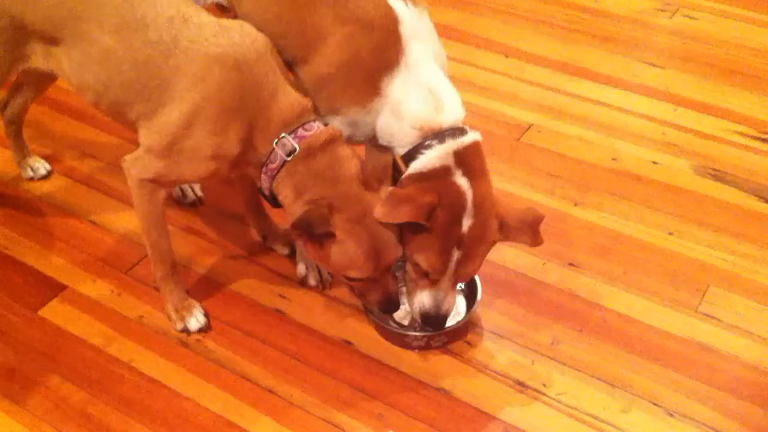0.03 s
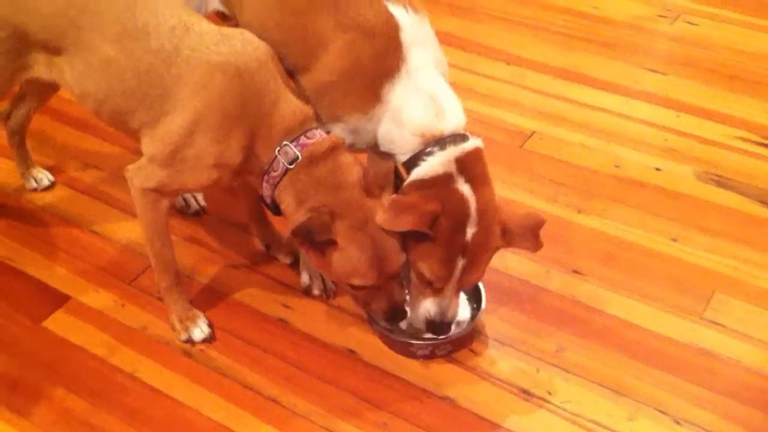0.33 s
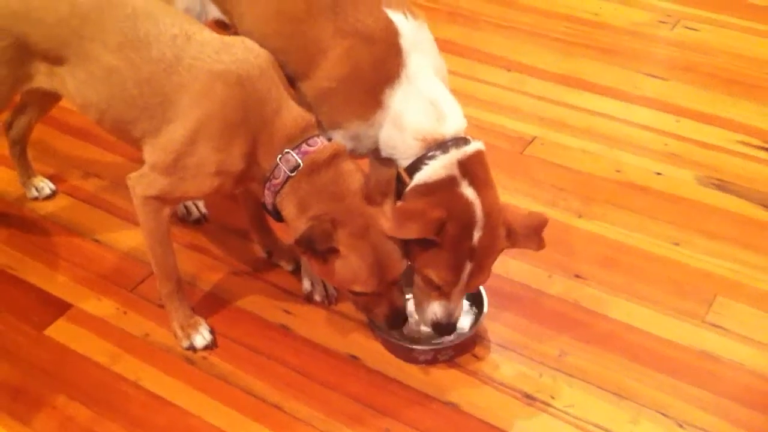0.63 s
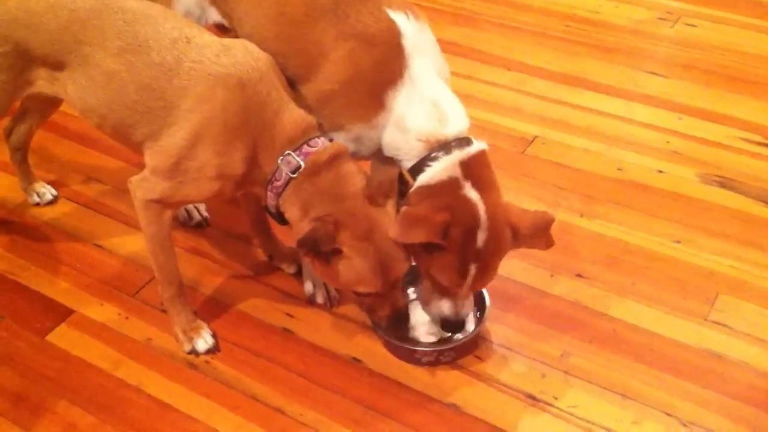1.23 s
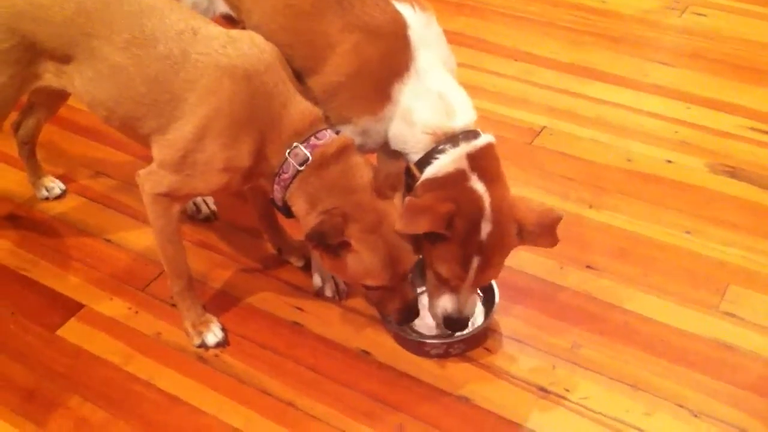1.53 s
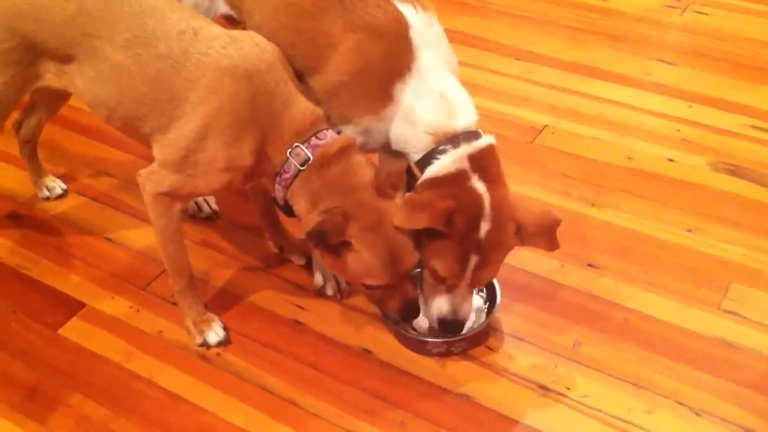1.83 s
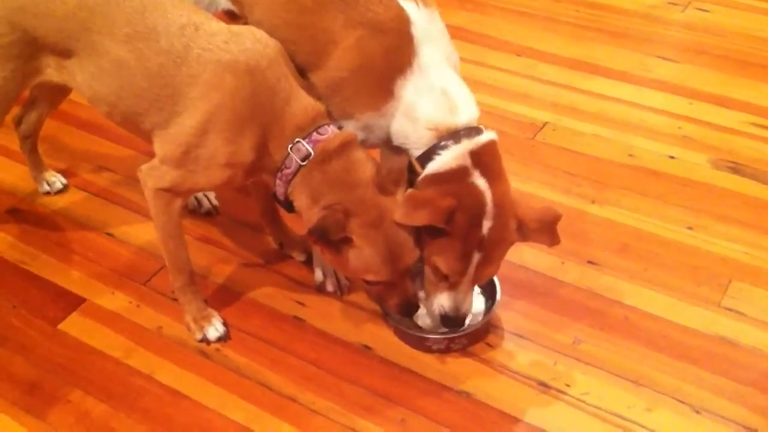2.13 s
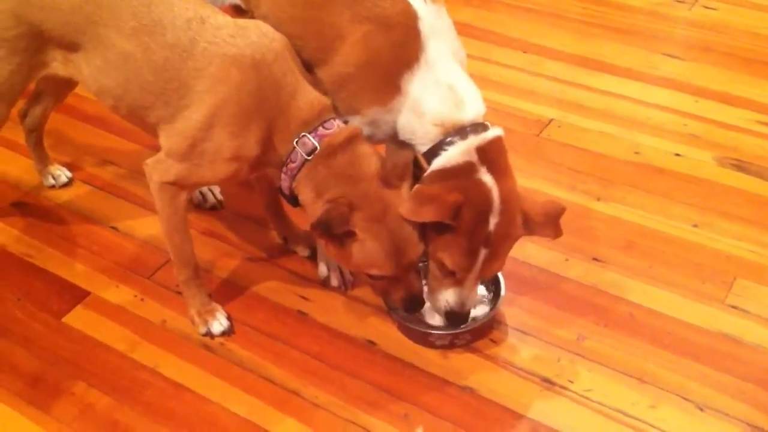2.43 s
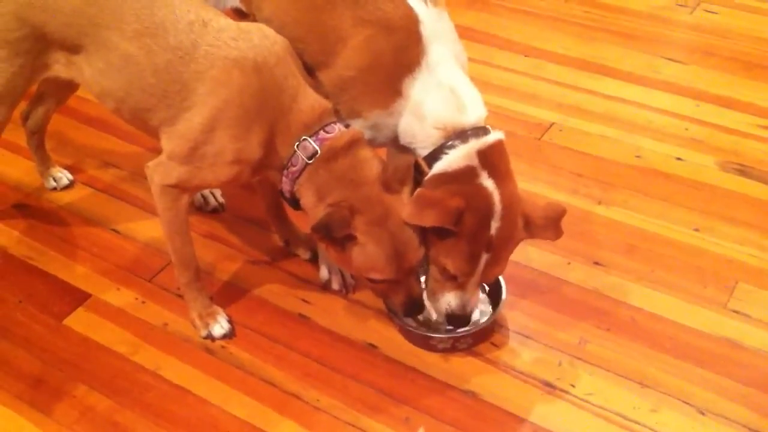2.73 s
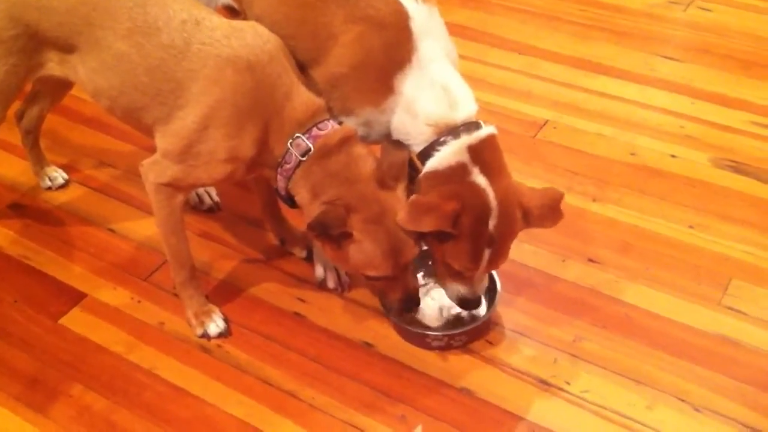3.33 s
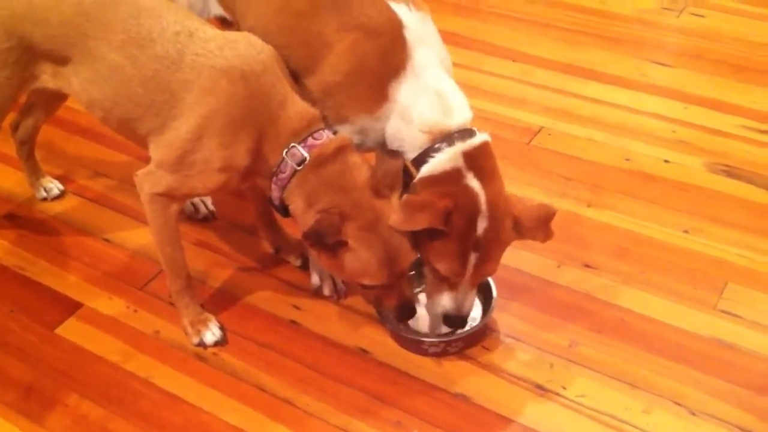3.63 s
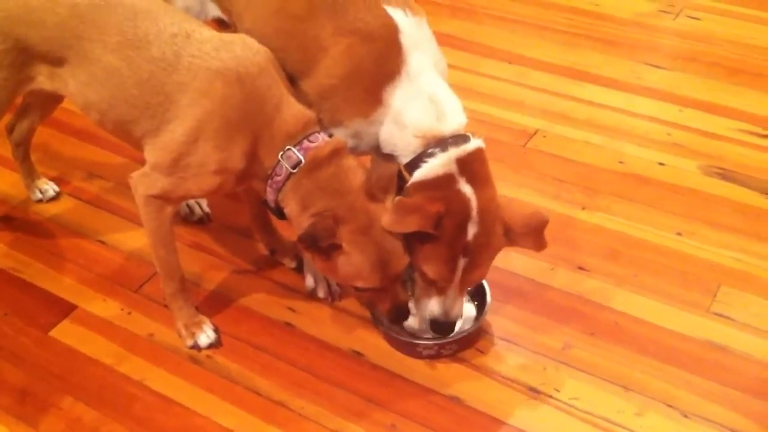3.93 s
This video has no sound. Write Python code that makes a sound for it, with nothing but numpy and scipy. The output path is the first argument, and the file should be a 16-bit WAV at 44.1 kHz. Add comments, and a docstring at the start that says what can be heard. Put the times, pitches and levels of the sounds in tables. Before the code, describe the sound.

Dogs drink from a metal bowl indoors, lapping irregularly with squelches, plops and trickling drops. The bowl rings faintly and a collar tag touches it early and again near the end, over a soft rush of room air.

```python
"""Two dogs at a water bowl

Two dogs lap from one steel bowl on the wooden floor of a lively room. Each lap is a wet smack of the
tongue, a spray of droplets and a squelch in the mouth; trapped air plops, drips fall back, a collar tag
chinks and the bowl rings faintly. An appliance hums under the steady rush of the room."""
import sys
import numpy as np
from scipy import signal
from scipy.fft import rfft, irfft
from scipy.io import wavfile

SR = 44100
rng = np.random.default_rng(int(sys.argv[2]) if len(sys.argv) > 2 else 0)


def output_pcm(signal):
    """Save a mono or channel-first signal as 16-bit PCM at the path in sys.argv[1].

    Samples are clipped to [-1, 1] before scaling.
    """
    pcm = np.clip(np.atleast_2d(signal).T, -1, 1) * 32767
    wavfile.write(sys.argv[1], SR, np.round(pcm).astype(np.int16))


N = 176400
TIME = np.arange(N) / SR
BRIEF = TIME[:SR // 8]  # time axis of one short event


def from_db(db):
    return 10 ** (np.asarray(db) / 20)


def unit_rms(x):
    return x / np.sqrt(np.mean(x ** 2) + 1e-20)


def at_hz(points, hz):
    """Reads a table on a log-frequency axis."""
    points_hz, values = np.transpose(points)
    return np.interp(np.log(hz + 1e-9), np.log(points_hz), values)


def add(out, start_s, x):
    i = int(start_s * SR)
    out[i:i + len(x)] += x[:N - i]


def band(x, low_hz, high_hz):
    edges = [low_hz, min(high_hz, SR / 2 - 2000)]
    return signal.sosfilt(signal.butter(2, edges, "band", fs=SR, output="sos"), x)


def resonate(x, hz, width_hz):
    """One resonance with a gain of 1 at its peak."""
    r = np.exp(-np.pi * width_hz / SR)
    feedback = [1, -2 * r * np.cos(2 * np.pi * hz / SR), r * r]
    return signal.lfilter(np.array([1, 0, -1]) * (1 - r * r) / 2, feedback, x + 1e-18)


def pops(per_s, size, spread_db=3.5):
    """Random clicks of uneven strength."""
    strength = from_db(spread_db * np.minimum(rng.exponential(1, size), 4))
    return (rng.random(size) < per_s / SR) * strength * rng.choice([-1, 1], size)


def swell(t, rise_s):
    """Rises to 1 after rise_s, then dies away."""
    u = np.maximum(t, 0) / rise_s
    return u * np.exp(1 - u)


def rising_phase(hz, glide_per_s):
    """Phase of a bubble whose pitch climbs steadily from hz."""
    return 2 * np.pi * hz * (BRIEF + glide_per_s * BRIEF ** 2 / 2)


def droplets(spectrum, per_s, cycles, sizes=32, small_bias=0.8):
    """Tiny bubbles ring for a few cycles, the small ones most often. Yields (Hz, sound) for each size."""
    pitches = np.geomspace(450, 15000, sizes)
    shares = pitches ** small_bias / np.sum(pitches ** small_bias)
    for hz, share in zip(pitches, shares):
        width_hz = 2 * hz / cycles
        ring = resonate(pops(per_s * share, N), hz, width_hz)
        ring = resonate(ring, hz, width_hz)  # the second pass softens each onset
        yield hz, from_db(at_hz(spectrum, hz)) * unit_rms(ring) / np.sqrt(sizes)


def room_air(level_db=-57):
    """Room tone: a steady, low rush of air."""
    # Each row: frequency in Hz, relative spectral density in dB.
    spectrum = [(50, -24.5), (70, -24), (95, -13.5), (125, -6), (200, 0.5), (250, 6), (310, 2), (460, -0.5),
                (600, -6), (1050, -7.5), (1300, -10.5), (2700, -16), (5300, -17), (6800, -26), (12900, -26),
                (15500, -39)]
    gain = from_db(at_hz(spectrum, np.fft.rfftfreq(N, 1 / SR)))
    return from_db(level_db) * unit_rms(irfft(rfft(rng.standard_normal(N)) * gain, N))


def appliance_hum(waver=0.48):
    """An appliance hums; a narrow band of noise around each tone makes it waver."""
    # The tones of the hum. Each row: frequency in Hz, level in dB.
    tones = [(157, -78.5), (175, -80), (236.5, -67), (410, -74.5), (472, -71.5)]
    out = np.zeros(N)
    for hz, db in tones:
        tone = np.sqrt(2) * np.sin(2 * np.pi * (hz * TIME + rng.random()))
        noise = unit_rms(resonate(rng.standard_normal(N), hz, width_hz=8.8))
        out += from_db(db) * (tone + waver * noise)
    return out


def room_response(tail_db=-2, build_s=0.0025, echo_db=-4.5, echo_span_s=0.025, echo_count=12):
    """A few early echoes off floor and furniture, then a diffuse tail that dies band by band."""
    # Reverberation. Each row: frequency in Hz, seconds to fall by 60 dB.
    t60 = [(200, 0.93), (900, 0.49), (2100, 0.71), (5500, 0.6), (14500, 0.59)]
    t, edges = TIME[:SR], np.geomspace(100, 18000, 12)
    tail, echoes = np.zeros(SR), np.zeros(SR)
    for low, high in zip(edges, edges[1:]):
        decay = from_db(-60 * t / at_hz(t60, np.sqrt(low * high)))
        tail += band(rng.standard_normal(SR), low, high) * decay
    tail *= 1 - np.exp(-(t / build_s) ** 2)
    signs = rng.choice([-1, 1], echo_count)
    delays_s = echo_span_s * rng.uniform(0.05, 1, echo_count)
    echoes[(delays_s * SR).astype(int)] = signs / np.sqrt(echo_count)
    return from_db(tail_db) * tail / np.linalg.norm(tail) + from_db(echo_db) * echoes


def room_echoes(water, spots=6, spot_change_s=0.008):
    """Drops burst at changing spots around the bobbing heads, so one set of echoes fades into the next."""
    out, place = np.zeros(N), TIME / spot_change_s
    for spot in range(spots):
        away = np.abs((place - spot + spots / 2) % spots - spots / 2)
        crossfade = np.cos(np.pi / 2 * np.minimum(away, 1))
        out += signal.fftconvolve(water * crossfade, room_response())[:N]
    return out


def bowl_ring(water, t60_s=0.29):
    """The steel wall rings along with the water."""
    # The modes of the bowl. Each row: frequency in Hz, gain in dB.
    modes = [(833, 0.5), (955, -12), (1016, 1.5), (1100, 10), (1190, 5), (1298, 5.5), (1351, 3), (2382, -5),
             (3798, -1)]
    width_hz = np.log(1000) / np.pi / t60_s
    return sum(from_db(db) * resonate(water, hz, width_hz) for hz, db in modes)


def tag_chinks(t60_s=0.37):
    """A metal collar tag touches the rim and rings on."""
    # Each row: start in seconds, relative level in dB, lowest mode in Hz.
    touches = [(0.402, -49, 3680), (3.14, -43, 3186), (3.278, -50, 5170)]
    # The modes of the tag. Each row: frequency ratio to the lowest mode, relative level in dB.
    modes = [(1.001, -4), (1.089, -8), (1.2, -12)]
    out, t = np.zeros(N), TIME[:SR // 2]
    for start_s, db, hz in touches:
        ring = sum(from_db(mode_db) * np.sin(2 * np.pi * hz * ratio * t) for ratio, mode_db in modes)
        add(out, start_s, from_db(db - 60 * t / t60_s) * ring / 2)
    return out


def fizz():
    """The finest spray bursts too densely to be heard as single ticks."""
    # Each row: time in seconds, level in dB.
    levels = [(.12, -68.5), (.23, -69), (.38, -62), (.55, -74), (1.15, -76), (1.28, -72), (1.62, -72.5),
              (1.98, -75), (2.2, -70), (2.46, -65), (2.65, -73.5), (3.2, -71.5), (3.35, -74), (3.83, -71)]
    spray = band(pops(per_s=4400, size=N), low_hz=10200, high_hz=17400)
    return from_db(np.interp(TIME, *np.transpose(levels))) * unit_rms(spray)


def dribble():
    """Between laps, water keeps ticking in the bowl and on the muzzles."""
    # Each row: time in seconds, relative level in dB.
    levels = [(.12, -54.5), (.4, -60), (.62, -56.5), (.92, -62.5), (1.25, -58.5), (1.5, -56), (1.62, -62.5),
              (1.9, -58.5), (2.35, -58), (2.72, -62), (3.05, -60.5), (3.45, -63), (3.68, -60), (3.83, -62),
              (4, -60)]
    # The colour of the ticking. Each row: droplet pitch in Hz, band gain in dB.
    spectrum = [(450, -6), (850, 2), (1300, -5), (2000, -3), (3200, -7.5), (5000, -3), (7200, -5),
                (10500, -8.5), (15000, -23)]
    ticks = sum(sound for _, sound in droplets(spectrum, per_s=1400, cycles=15.4))
    return from_db(np.interp(TIME, *np.transpose(levels))) * ticks


def drips(splash_db=-6):
    """Each drip traps a tiny bubble: a high, rising ping with a little splash around it."""
    # Each row: start in seconds, peak level of the ping in dB, starting pitch in Hz.
    landings = [(0.401, -42, 4380), (0.488, -51, 5160), (0.777, -46, 4400), (0.793, -46, 4670),
                (.827, -46, 5800), (.851, -46, 4760), (1.008, -44, 3920), (1.857, -39, 2840),
                (1.988, -41, 11160), (2.063, -39, 3130), (2.136, -45.5, 4570), (2.199, -47, 5800),
                (2.239, -44, 4170), (2.421, -48, 3150), (2.575, -49, 4750), (2.77, -51, 4830),
                (3.038, -51.5, 4430), (3.123, -44, 10600), (3.131, -48, 4200), (3.279, -42.5, 5160),
                (3.542, -42, 9050), (3.662, -46.5, 5400), (3.698, -50, 4660), (3.778, -49, 5100)]
    out, envelope = np.zeros(N), swell(BRIEF, rise_s=0.00075)
    for start_s, db, hz in landings:
        ping = np.sin(rising_phase(hz, glide_per_s=4.4))
        splash = unit_rms(band(rng.standard_normal(len(BRIEF)), hz / np.sqrt(2), hz * np.sqrt(2)))
        add(out, start_s, from_db(db) * envelope * (ping + from_db(splash_db) * splash))
    return out


def plops(rise_s=0.00075, decay_s=0.005, overtone_db=-17):
    """Large bubbles of trapped air ring briefly and rise in pitch."""
    # Each row: start in seconds, peak level in dB, starting pitch in Hz.
    bubbles = [(.4025, -34, 846), (.417, -40.5, 940), (.793, -43.5, 1010), (0.8016, -43.5, 1505),
               (.994, -39.5, 820), (1.391, -50, 945), (1.67, -48, 850), (1.769, -44.5, 1216),
               (1.826, -45.5, 1124), (2.132, -33.5, 1000), (2.146, -41, 993), (2.154, -45, 994),
               (2.169, -43.5, 1060), (2.191, -35.5, 1017), (2.2, -42.5, 1300), (2.326, -44.5, 960),
               (2.456, -42, 737), (2.547, -45.5, 784), (2.799, -50, 920), (2.928, -45.5, 740),
               (3.131, -44, 740), (3.623, -39.5, 860), (3.9, -44, 1490)]
    out = np.zeros(N)
    envelope = (1 - np.exp(-BRIEF / rise_s)) * np.exp(-(BRIEF / decay_s) ** 2)
    for start_s, db, hz in bubbles:
        phase = rising_phase(hz, glide_per_s=5.4)
        ring = np.sin(phase) + from_db(overtone_db) * np.sin(2 * phase)
        add(out, start_s, from_db(db) * envelope / envelope.max() * ring)
    return out


def squelches(rise_s=0.0067, pitch_fall=0.1456, band_ratio=1.46):
    """The mouth closes on the water: wet pops ring its cavity, whose pitch falls as it fills."""
    # Each row: start in seconds, level in dB, pitch the cavity settles on in Hz.
    closings = [(0.127, -54, 1115), (.325, -57, 1440), (0.474, -60.5, 2040), (.667, -47.5, 1420),
                (.8, -46.5, 1370), (1.0, -48, 1380), (1.128, -53, 1300), (1.728, -49.5, 1440),
                (1.79, -51.5, 1190), (1.793, -52.5, 2200), (1.849, -56, 1250), (2.072, -50, 1960),
                (2.076, -48, 1340), (2.195, -50.5, 1440), (2.362, -59.5, 2050), (2.612, -56, 1300),
                (2.804, -51.5, 1400), (3.14, -52.5, 1500), (3.541, -57.5, 1290), (3.623, -54.5, 1720),
                (3.682, -53.5, 1230), (3.886, -50, 2130), (3.893, -49.5, 1600), (3.955, -58, 2100)]
    out, envelope = np.zeros(N), swell(BRIEF, rise_s)
    # This clock runs fast at first, so each squelch starts sharp and sinks.
    fall_s = 2 * rise_s
    clock = BRIEF + pitch_fall * fall_s * (1 - np.exp(-BRIEF / fall_s))
    for start_s, db, hz in closings:
        wet_pops = pops(per_s=800, size=len(BRIEF)) * envelope
        cavity = band(resonate(wet_pops, hz, width_hz=350), hz / band_ratio, hz * band_ratio)
        falling = unit_rms(np.interp(clock, BRIEF, cavity))
        add(out, start_s, from_db(db) * falling * np.sqrt(np.mean(envelope ** 2)))
    return out


def splashes(cluster_db=7, cluster_octaves=0.4, patchy_db=3.5):
    """Water sprays off the tongue in short showers, each with a cluster of drops of one size."""
    # Each row: start in seconds, rise in seconds, relative level in dB, tilt in dB per octave,
    # pitch of the cluster in Hz.
    showers = [(.21, 0.0081, -63, 4, 1900), (0.315, 0.0083, -55, -4.5, 4350), (0.484, 0.012, -54, -3, 5030),
               (0.651, 0.011, -53.5, -1.5, 6400), (0.788, 0.017, -58.5, -3.5, 5300),
               (1.003, 0.0045, -45.5, -3.5, 3740), (1.129, 0.0063, -51.5, -3.5, 5400),
               (1.256, 0.0069, -62.5, 1, 2600), (1.524, 0.0088, -61, -4.5, 3220),
               (1.722, 0.0087, -46, -0.5, 4300), (1.846, 0.015, -55, -1.5, 3560),
               (2.06, 0.01, -45.5, 2, 1940), (2.181, 0.012, -55, -4, 5640),
               (2.44, 0.016, -50.5, -0.5, 4600), (2.574, 0.019, -58.5, -2, 4440),
               (2.792, 0.014, -52, 1, 2130), (2.922, 0.011, -59, -5.5, 5400),
               (3.124, 0.016, -49.5, 1, 3320), (3.261, 0.02, -56.5, 1, 5100), (3.528, 0.014, -52, -1, 6100),
               (3.883, 0.009, -46, -0.5, 10400)]
    # The colour of the spray. Each row: droplet pitch in Hz, band gain in dB.
    spectrum = [(500, -17), (1000, -1), (1700, -7.5), (2600, 1), (3500, 1), (5400, 0.5), (7900, -5.5),
                (10500, 3), (15000, -3.5)]
    envelopes = np.array([swell(TIME - start_s, rise_s) for start_s, rise_s, *_ in showers])
    _, _, db, tilt, cluster_hz = np.transpose(showers)
    out = np.zeros(N)
    for hz, sound in droplets(spectrum, per_s=7000, cycles=10.4):
        cluster = cluster_db * np.exp(-(np.log2(hz / cluster_hz) / cluster_octaves) ** 2)
        scatter = patchy_db * rng.standard_normal(len(db))
        gains = from_db(db + tilt * np.log2(hz / 4000) + cluster + scatter)
        out += sound * (gains @ envelopes)
    return out


def tongue_smacks(decay_s=0.00084, lead_s=0.0011, width_octaves=1.05, ripple_db=4, ripple_hz=710):
    """The tongue snaps off the water: a crack a few milliseconds long, coloured by the mouth's shape."""
    # Each row: time in seconds, relative level in dB, centre of the band in Hz.
    snaps = [(.644, -40, 5600), (.665, -38, 8000), (0.9931, -25.5, 4650), (0.9985, -28, 10300),
             (1.1307, -36, 1960), (1.7255, -26.5, 9600), (2.0641, -35.5, 7900), (2.797, -43, 7000),
             (2.869, -38.5, 4870), (3.139, -34, 4750), (3.273, -40, 9400), (3.543, -41, 6500),
             (3.8803, -25.5, 5770), (3.8878, -41, 2480)]
    out, fade = np.zeros(N), np.exp(-BRIEF / decay_s)
    bins_hz, band_ratio = np.fft.rfftfreq(len(BRIEF), 1 / SR), 2 ** (width_octaves / 2)
    for time_s, db, hz in snaps:
        mouth_ripple = np.interp(bins_hz / ripple_hz, np.arange(64), rng.standard_normal(64))
        # The phases of a short noise burst smear the crack in time.
        phase = np.angle(rfft(rng.standard_normal(len(BRIEF)) * fade))
        smear = irfft(from_db(ripple_db * mouth_ripple) * np.exp(1j * phase))
        smear = np.roll(smear, int(lead_s * SR))[:len(BRIEF) // 2]
        crack = band(smear, hz / band_ratio, hz * band_ratio)
        crack *= np.linalg.norm(fade) / np.linalg.norm(crack) / np.sqrt(2)
        add(out, time_s - lead_s, from_db(db) * crack)
    return out


def scene():
    """One microphone hears the lapping, its echoes and the ringing metal over the room tone."""
    water = tongue_smacks() + splashes() + dribble() + fizz() + squelches() + plops() + drips()
    water_in_room = water + room_echoes(water)
    metal = bowl_ring(water_in_room) + tag_chinks()
    return (water_in_room + metal + room_air() + appliance_hum())[None]


def record(dry, start_s=0.12, cutoff_hz=15700):
    """Sound begins after a moment of silence; the highest treble is cut steeply."""
    lowpass = signal.ellip(10, 0.1, 70, cutoff_hz, fs=SR, output="sos")
    return signal.sosfilt(lowpass, dry * (TIME >= start_s))


dry = scene()
out = record(dry)
output_pcm(out)
```